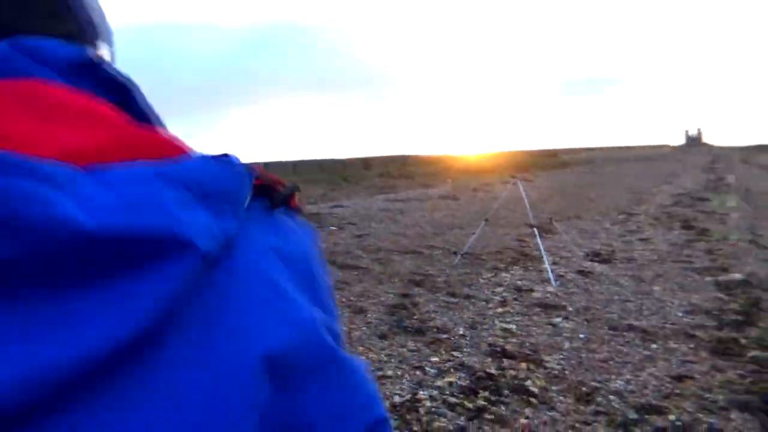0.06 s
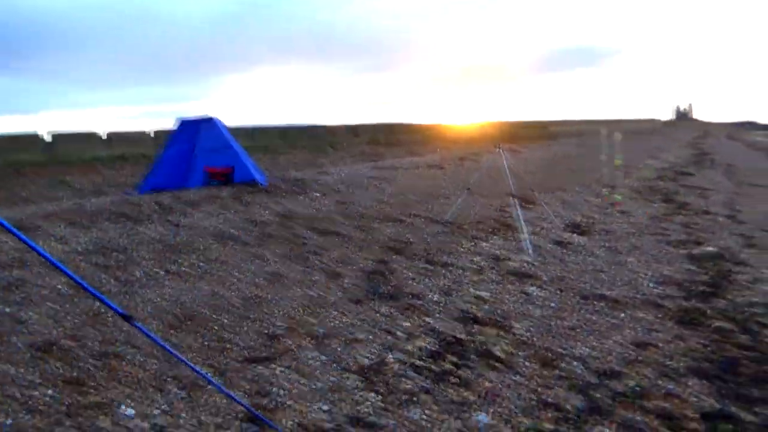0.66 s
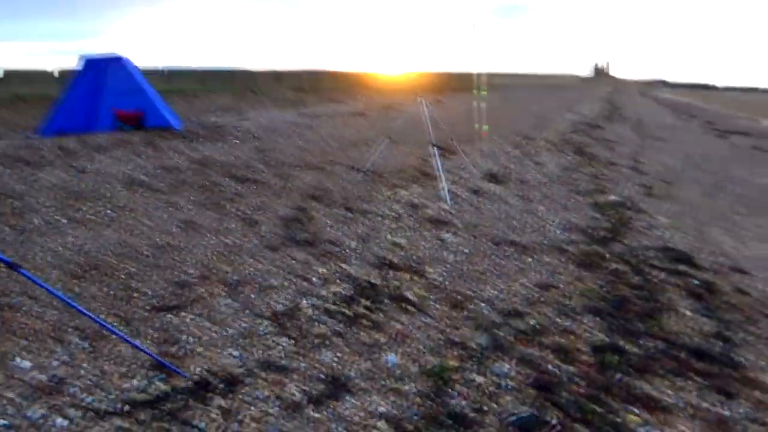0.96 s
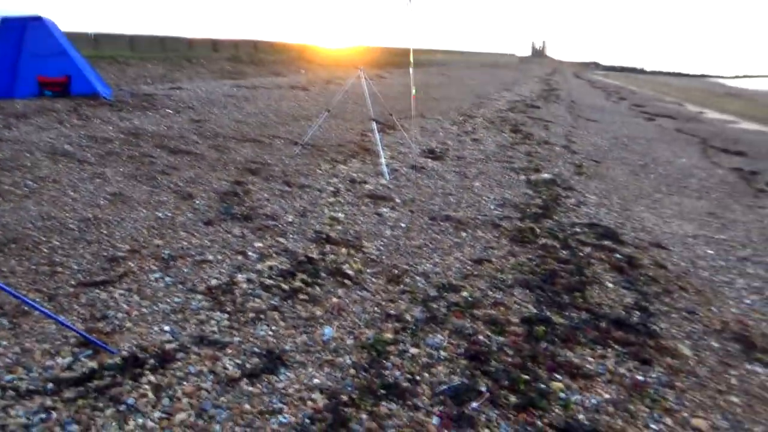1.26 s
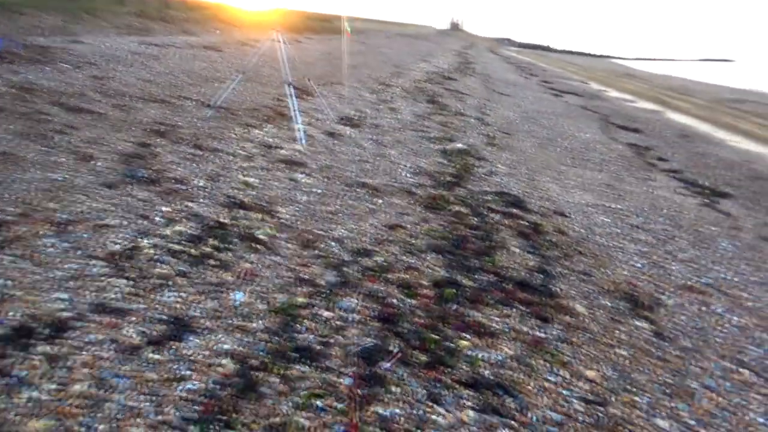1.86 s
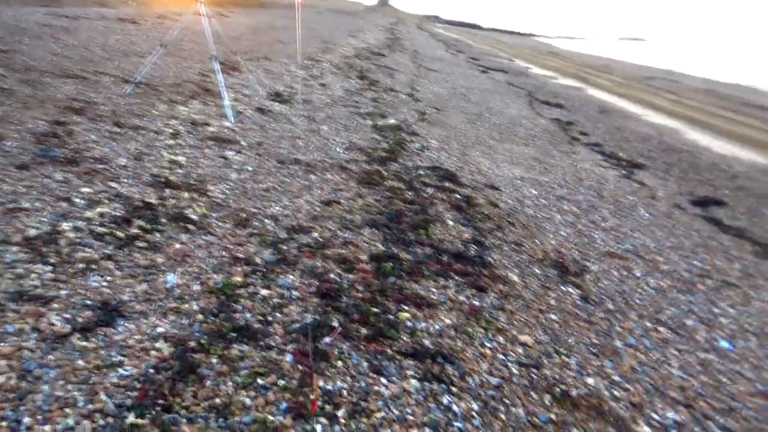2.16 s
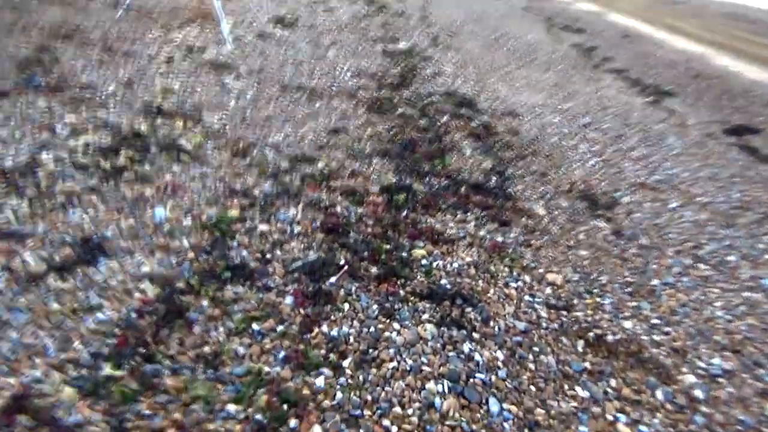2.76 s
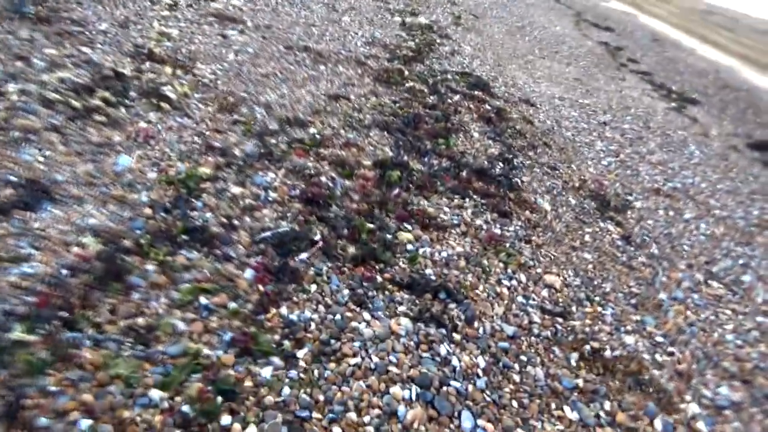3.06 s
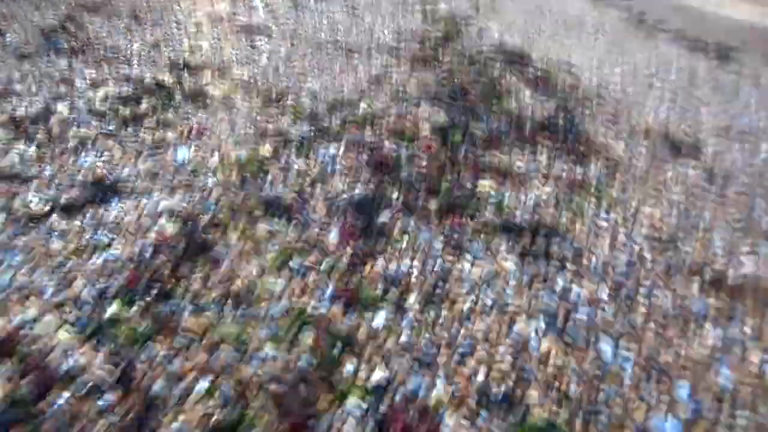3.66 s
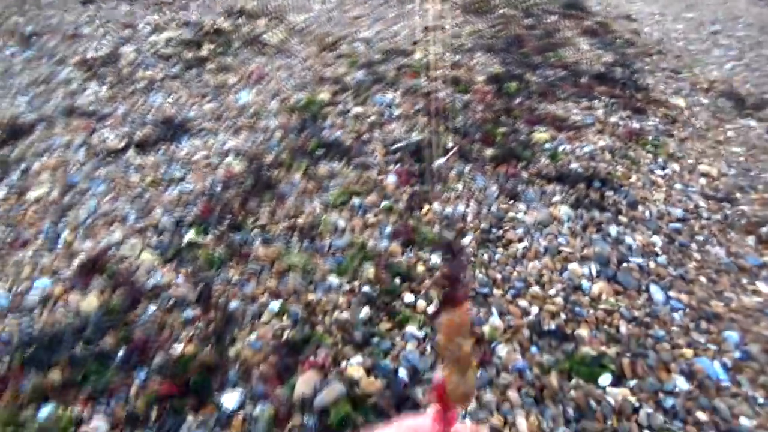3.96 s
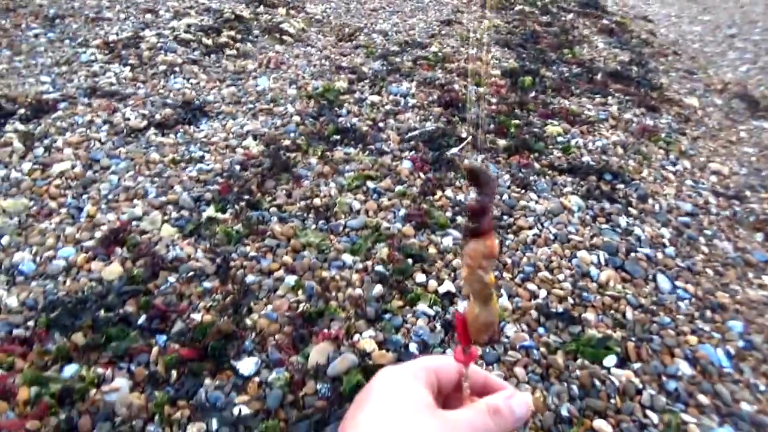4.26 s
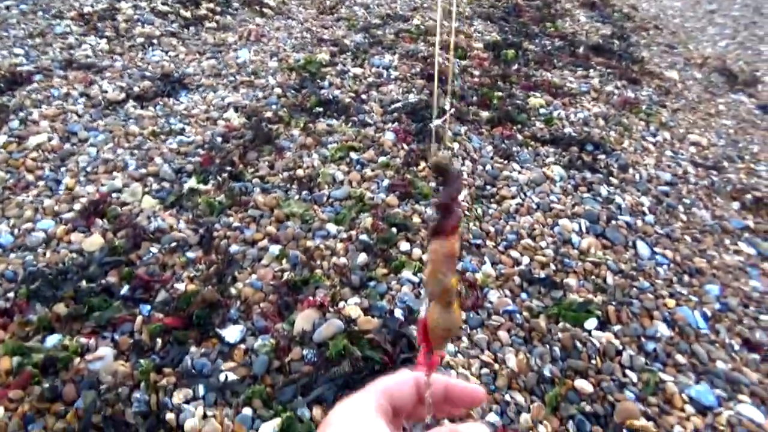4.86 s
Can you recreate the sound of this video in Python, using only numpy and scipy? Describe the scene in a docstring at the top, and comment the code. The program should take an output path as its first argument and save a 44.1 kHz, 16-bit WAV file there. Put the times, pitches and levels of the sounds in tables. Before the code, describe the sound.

A waterproof jacket scrapes directly over the microphone of a hand-held camera, loud and close from the start. Until about 1.3 seconds it comes in uneven surges, a bright hiss when fast and a crackle as it slows, with sharp little creaks from the folds. From 1.4 to 2.6 seconds the rubbing is weaker and patchier, jumping between left and right, with a hollow thrum from the camera body and a few faint bumps. A second loud stretch of scraping runs from 2.6 to 3.4 seconds, then dies away with a few ticks. From about 3.9 seconds a sleeve brushes lightly in short, grainy strokes over a low hiss, and a faint, airy ring from the rubbed case closes it around 5 seconds. Soft surf washes on the shingle beach throughout, while a very faint, far-off engine hum sinks slightly and fades at about 4.3 seconds.

```python
"""A waterproof jacket drags over a hand-held camera's two microphone ports, on a shingle beach.
The weave sticks and slips in surges: hiss when fast, crackle as it slows. Folds snap free and creak.
Coarser slips pass through the case, which rings and thrums; the hand nudges the case.
Later the cloth quietens and a sleeve brushes lightly; a faint, breath-like ring near 1340 Hz ends it.
Behind lie soft surf and the faint, sinking hum of a far-off engine."""
import sys
import numpy as np
from scipy import signal
from scipy.fft import rfft, irfft, next_fast_len
from scipy.io import wavfile
from scipy.ndimage import uniform_filter1d

SR = 44100
rng = np.random.default_rng(int(sys.argv[2]) if len(sys.argv) > 2 else 0)


def generate_wav(signal):
    """Clip the signal to [-1, 1] and save it as 16-bit WAV at the path in sys.argv[1]."""
    frames = np.transpose(np.atleast_2d(signal))
    scaled = np.clip(frames, -1, 1) * 32767
    pcm = np.round(scaled).astype(np.int16)
    wavfile.write(sys.argv[1], SR, pcm)


N = 226233
TIME = np.arange(N) / SR


def scrape():
    """Weave slips over the ports; slips grow uneven as a pull fades, and more threads snag."""
    # cloth pulls: (start [s], end [s], level [dB], sag [dB/s], rise [s], fade [s],
    # relative sheen [dB], base slip spread [dB])
    pulls = [(0, 0.312, -14, 5, .01, 0.071, -12.5, 0), (0.382, 0.612, -21, 27, 0.034, 0.074, -11.5, 6.5),
             (0.656, 0.823, -19.5, -5, 0.0077, 0.035, -20, -1),
             (.83, 0.883, -17.5, 0, 0.018, 0.071, -10, 3), (0.942, 1.265, -17.5, 21.5, .01, 0.12, -10, 6.5),
             (1.329, 1.473, -25.5, 6, 0.038, 0.14, -12.5, 4.5), (1.733, 1.773, -35, 0, .02, .07, -5.5, 1),
             (1.888, 2.023, -33.5, 24, 0.0068, 0.028, 3.5, 4),
             (2.093, 2.294, -33.5, 7, .04, 0.038, -7.5, 6), (2.327, 2.367, -25, 0, .025, 0.084, -8, 6.5),
             (2.449, 2.57, -31.5, 15, 0.022, 0.037, 2.5, 6),
             (2.598, 3.05, -15.5, 0.5, 0.0091, 0.086, -12.5, -0.5),
             (3.151, 3.203, -16.5, 0, 0.043, 0.029, -14.5, 1),
             (3.234, 3.431, -14, 19, 0.034, 0.083, -16.5, 0), (3.85, 5.128, -45, 9.5, .1, .1, -12.5, 8)]
    # port hiss spectrum: (frequency [Hz], level [dB])
    hiss_spectrum = [(100, -71), (1500, -31), (3000, -18.5), (4200, -12), (5500, -6), (7000, -3),
                     (8300, -1.5), (9200, -2), (10000, -6.5), (11500, -17), (13000, -36), (15500, -41)]
    # top-octave sheen spectrum: (frequency [Hz], level [dB])
    sheen_spectrum = [(1000, -71), (6500, -10), (8800, 7.5), (10000, 3), (11800, 0), (13500, -5.5),
                      (15500, -13)]
    spread_per_fade_db = 0.1
    shapes_db, sheens_db, spreads_db = [], [], []
    for start, end, db, sag_db_per_s, rise_s, fade_s, sheen_db, base_spread_db in pulls:
        sag_db = sag_db_per_s * np.clip(TIME - start, 0, end - start)
        shapes_db.append(db - sag_db + stroke(start, end, rise_s, fade_s))
        sheens_db.append(sheen_db)
        spreads_db.append(base_spread_db - spread_per_fade_db * stroke(0, end, rise_s, fade_s))
    spread_db = np.clip(blend(shapes_db, spreads_db), 0, 12)
    grain = slips(spread_db, rate_hz=2600, relax_s=0.0029)
    drag = grain * power_sum(shapes_db, np.zeros(len(pulls)))
    force = snags(drag, share=0.044 * spread_db, rate_hz=360, spread_db=6.5, relax_s=0.00063)
    hiss = ports(force, hiss_spectrum, side_db=-18)
    sheen = ports(grain * power_sum(shapes_db, sheens_db) * undb(5.5), sheen_spectrum)
    return cover(hiss, depth=1.14) + cover(sheen, depth=0.07)


def slips(spread_db, rate_hz, relax_s):
    """Stick-slip force of even mean power: random slips, each relaxing exponentially."""
    onsets = rng.random(N) < rate_hz / SR
    size_db = spread_db * np.clip(rng.standard_normal(N), -2.3, 2.3)
    pole = np.exp(-2 / (relax_s * SR))
    power = signal.lfilter([1], [1, -pole], onsets * undb(size_db) ** 2) + 1e-9
    return np.sqrt(power / np.maximum(uniform_filter1d(power, size=2200), 1e-9))


def snags(force, share, rate_hz, spread_db, relax_s):
    """Threads catch and let go: a share of the power arrives as short ticks."""
    share = np.clip(share, 0, 0.9)
    return force * np.sqrt(1 - share + share * slips(spread_db, rate_hz, relax_s) ** 2)


def cover(pair, depth):
    """Cloth lies more on one port than on the other."""
    # port balance at depth 1: (time [s], left minus right [dB])
    balance_curve = [(0, 0.5), (.63, 0), (.67, 6.5), (.86, 1.5), (1.22, 2.5), (1.48, 15.5), (1.84, 14),
                     (1.9, -20), (2.02, 19.5), (2.35, -0.5), (2.54, -8), (2.62, 0), (3.37, -1.3), (3.44, 6),
                     (3.55, -7), (3.95, -0.5)]
    pan_db = depth * np.interp(TIME, *np.transpose(balance_curve))
    balance = undb(np.array([pan_db, -pan_db]) / 2)
    return pair * balance / balance.mean(axis=0)


def case_rub():
    """Coarser slips ring and thrum the case; a faint, breath-like ring follows at the end."""
    # surges of cloth on the case, except the last row, a faint, breath-like ring near 1340 Hz:
    # (start [s], end [s], relative dry rub [dB], relative hollow ring [dB], relative thrum [dB],
    # narrow ring pitch [Hz], narrow ring level [dB])
    surges = [(0, 0.033, -28.5, -39, -44, 920, -46), (.14, 0.314, -34, -40, -47, 937, -54),
              (.37, 0.668, -37, -39, -47, 957, -41), (.74, 0.794, -27, -34, -39, 978, -38),
              (.92, 0.952, -35, -36.5, -48, 939, -42), (1.02, 1.26, -46, -47.5, -53, 968, -51),
              (1.33, 1.44, -31.5, -34.5, -36.5, 1237, -40.5), (1.62, 1.699, -40, -37.5, -39.5, 1146, -40.5),
              (1.75, 1.839, -37, -34, -39.5, 1140, -44), (1.92, 1.984, -31, -33, -35.5, 1398, -40),
              (2.08, 2.16, -41, -39, -48, 1204, -59), (2.25, 2.47, -34.5, -31.5, -38, 1163, -48),
              (2.53, 2.625, -33, -29.5, -42, 1150, -52), (2.8, 2.857, -22.5, -24, -41.5, 866, -33.5),
              (2.93, 3.241, -25, -30.5, -42, 894, -36.5), (3.29, 3.36, -22.5, -31.5, -38.5, 894, -43),
              (3.43, 3.46, -28.5, -27.5, -37.5, 1151, -44), (3.6, 3.903, -47.5, -49, -53.5, 886, -64),
              (4.02, 4.334, -48.5, -44.5, -50, 960, -64), (4.7, 5.13, -52.5, -47, -50.5, 1340, -51)]
    # dull scuffs on the case: (crest time [s], level [dB])
    scuff_crests = [(.572, -29), (1.15, -35), (1.396, -27), (1.442, -31), (1.633, -33), (4.2, -37),
                    (4.625, -39)]
    # dry rub spectrum: (frequency [Hz], level [dB])
    rub_spectrum = [(50, -56), (400, -36), (1000, -4.5), (1600, -1), (2100, 0), (2800, 0), (4000, 0.5),
                    (5500, -1), (8000, -1.5), (14000, -46)]
    # hollow ring spectrum: (frequency [Hz], level [dB])
    hollow_spectrum = [(50, -53), (300, -31.5), (550, -6), (750, -0.5), (900, 1), (1150, 0), (1400, -1),
                       (2000, -6), (4000, -43)]
    # low thrum spectrum: (frequency [Hz], level [dB])
    thrum_spectrum = [(25, -31), (60, -29), (110, -30.5), (160, -14), (230, -10), (340, -0.5), (460, -1.5),
                      (570, -6), (800, -8.5), (1600, -34)]
    rub_gain_db, hollow_gain_db, thrum_gain_db = 2, -3, -1
    starts, ends, rub_db, hollow_db, thrum_db, ring_hz, ring_db = np.transpose(surges)
    shapes_db = np.array([stroke(a, b, rise_s=0.056, fade_s=0.061) for a, b in zip(starts, ends)])
    force = slips(spread_db=0.4, rate_hz=1800, relax_s=0.0021)
    scuffs = swells(scuff_crests, rise_s=0.0045, fade_s=0.008)
    rub_force = force * power_sum(shapes_db, rub_db + rub_gain_db)
    hollow_force = force * np.hypot(power_sum(shapes_db, hollow_db + hollow_gain_db), scuffs)
    rub = ports(rub_force, rub_spectrum, side_db=-3.5, lag_s=1e-5)
    hollow = ports(hollow_force, hollow_spectrum, lag_s=7e-5)
    thrum = ports(power_sum(shapes_db, thrum_db + thrum_gain_db), thrum_spectrum, lag_s=9e-5)
    ring = narrow_ring(force, blend(shapes_db, ring_hz), width_hz=150, lag_s=8e-5)
    return cover(rub, depth=0.45) + hollow + thrum + ring * power_sum(shapes_db, ring_db)


def narrow_ring(force, hz, width_hz, lag_s):
    """Breathy ring: a narrow band of noise around a moving pitch."""
    push = force * (rng.standard_normal(N) + 1j * rng.standard_normal(N))
    baseband = signal.sosfilt(signal.butter(2, width_hz / 2, fs=SR, output="sos"), push)
    carrier = np.exp(2j * np.pi * np.cumsum(hz) / SR)
    ring = unit(np.real(baseband * carrier))
    return np.array([ring, delay(ring, lag_s)])


def creaks(tick_s=0.00016, stutter_t60_s=0.011):
    """Folds snap free and ring the ports: one sharp tick and a short stutter each."""
    # fold snaps: (time [s], relative peak [dB], pitch [Hz], stutter gain [dB])
    folds = [(.3926, 2, 8500, -4), (.415, -3, 6850, -14), (.4549, -2, 7500, -5), (.462, -1, 8790, -7),
             (.5884, -5, 8500, -3), (.9136, -3, 8530, -13), (1.096, -2, 7810, -13), (1.1116, -6, 8610, -9),
             (1.1327, -5, 7390, -4), (1.1574, 2.5, 8100, -13), (1.1752, -1, 9280, -23),
             (1.1818, -7, 8900, -10), (1.2006, 1, 8700, -19), (1.208, 5, 8910, -20), (1.229, -1, 9300, -24),
             (1.2574, 0, 7930, -12), (1.267, 4.5, 7900, 7), (1.3089, -5, 7000, -14),
             (1.5904, -10.5, 8650, -8), (1.8236, -18, 8860, -6), (2.0153, -11, 9100, -6),
             (2.1073, -2, 7760, 0), (2.135, -9.5, 6260, -6), (2.153, -9, 7500, -9), (2.172, -15, 7970, -6),
             (2.3458, -4, 9100, -10), (2.3613, -4, 8800, -7), (2.4793, -2, 8170, -14),
             (2.4973, -3.5, 9100, -4), (2.5128, 0, 8260, -9), (3.539, -8, 6570, -15),
             (3.5583, -5.5, 8280, -10), (3.604, -4.5, 8460, -27), (3.6544, -13.5, 7700, -6),
             (3.6671, -16, 7770, -13), (3.7165, -17, 7100, -2), (3.7314, -16.5, 7350, -7),
             (4.2024, -29, 7350, -12), (4.7314, -25, 8820, -7)]
    out = np.zeros(N)
    t = np.arange(2000) / SR
    for time_s, db, hz, stutter_db in folds:
        tick = np.sin(2 * np.pi * hz * t) * (t / tick_s) * np.exp(-t / tick_s)
        band = signal.butter(2, [0.78 * hz, 1.31 * hz], "band", fs=SR, output="sos")
        stutter = signal.sosfilt(band, rng.standard_normal(len(t)))
        snap = tick + stutter * undb(stutter_db - 60 * t / stutter_t60_s)
        i = int((time_s + 0.0004) * SR)
        out[i:i + len(t)] += undb(db - 2.5) * snap / np.abs(snap).max()
    return out


def sleeve():
    """The sleeve brushes in short strokes, grainy with snagging threads."""
    # light brushes: (crest time [s], relative level [dB])
    crests = [(3.88, -43), (3.965, -36.5), (4.04, -35), (4.092, -36), (4.13, -38), (4.194, -33.5),
              (4.273, -44), (4.322, -38.5), (4.358, -37), (4.506, -38), (4.626, -35.5), (4.733, -38),
              (4.799, -37.5)]
    # sleeve friction spectrum: (frequency [Hz], level [dB])
    spectrum = [(100, -41), (300, 7.5), (550, -4), (900, 6.5), (1700, -3), (3000, -3), (5000, -3.5),
                (7000, -1.5), (9200, -4.5), (11000, -14), (15000, -34)]
    strokes = undb(2) * swells(crests, rise_s=0.0028, fade_s=0.015)
    force = snags(strokes, share=0.6, rate_hz=700, spread_db=4.5, relax_s=0.00053)
    return ports(force, spectrum, side_db=-4)


def nudges():
    """The hand bumps the case: faint low thuds."""
    # bumps: (crest time [s], level [dB])
    crests = [(.675, -51), (1.19, -62), (1.89, -57), (2.56, -55)]
    # thud spectrum: (frequency [Hz], level [dB])
    spectrum = [(20, -14), (45, -5), (90, -10), (150, -6), (300, -34), (900, -55)]
    return ports(swells(crests, rise_s=0.01, fade_s=0.033), spectrum)


def surf(level_db=-47.5, level_at_s=3.48, rise_db_per_s=0.6):
    """Soft wash on the shingle, wavering as it slowly builds."""
    # wash spectrum: (frequency [Hz], level [dB])
    spectrum = [(25, -34), (60, -17.5), (120, -7), (200, 0.5), (280, 2), (450, -2.5), (750, 3.5),
                (1300, -3), (2000, -7), (3200, -7), (8000, -25), (15000, -24)]
    wash_db = level_db + rise_db_per_s * (TIME - level_at_s) + wander(7.6)
    return ports(undb(wash_db), spectrum, side_db=9.5)


def engine_hum(start_hz=402.6, sag_hz_per_s=7.8, level_db=-53.5, end_s=4.33):
    """Far-off engine: one wavering tone that sinks, then fades."""
    hz = (start_hz - sag_hz_per_s * TIME) * (1 + 0.008 * wander(35))
    phase = 2 * np.pi * np.cumsum(hz) / SR
    envelope_db = level_db + stroke(0, end_s, rise_s=0.072, fade_s=0.072)
    flutter_db = 2.6 * wander(16) + 2.2 * wander(55)
    return np.sqrt(2) * np.sin(phase) * undb(envelope_db + flutter_db)


def ports(envelope, spectrum, side_db=0, lag_s=0):
    """Coloured noise at both ports: mid at the envelope's RMS, lagged on the right, plus side."""
    # difference between the ports, before side_db: (frequency [Hz], side minus mid [dB])
    width = [(100, -44), (300, -23.5), (600, -17), (1500, -20.5), (4000, -10), (8000, -4.5), (13000, -85)]
    mid, side = colour(envelope * rng.standard_normal((2, N)), spectrum)
    side = undb(side_db) * colour(side, width)
    pair = np.array([mid + side, delay(mid, lag_s) - side])
    return pair * np.sqrt(np.mean(envelope ** 2) / np.mean(mid ** 2))


def colour(x, spectrum):
    """Minimum-phase filter through (frequency [Hz], gain [dB]) points."""
    size = next_fast_len(N + 4096, real=True)
    hz, db = np.transpose(spectrum)
    bin_hz = np.arange(size // 2 + 1) * SR / size
    gain_db = np.interp(np.log(bin_hz + 1), np.log(hz), db)
    cepstrum = irfft(np.log(undb(gain_db)), size)
    cepstrum[1:size // 2] *= 2
    cepstrum[size // 2 + 1:] = 0
    return irfft(rfft(x, size) * np.exp(rfft(cepstrum)), size)[..., :N]


def stroke(start_s, end_s, rise_s, fade_s):
    """Envelope [dB]: 0 from start to end, exponential rise before and fade after."""
    before = np.maximum(start_s - TIME, 0) / rise_s
    after = np.maximum(TIME - end_s, 0) / fade_s
    return -20 / np.log(10) * (before + after)


def swells(crests, rise_s, fade_s):
    """Amplitude with one rise and fade per (time [s], level [dB]) row."""
    return sum(undb(db + stroke(s, s, rise_s, fade_s)) for s, db in crests)


def power_sum(shapes_db, levels_db):
    """Joint amplitude of overlapping movements."""
    return np.sqrt(sum(undb(shape + db) ** 2 for shape, db in zip(shapes_db, levels_db)) + 1e-18)


def blend(shapes_db, values):
    """Power-weighted mean of one value per movement."""
    weights = undb(shapes_db - np.max(shapes_db, axis=0)) ** 2
    return sum(w * v for w, v in zip(weights, values)) / weights.sum(axis=0)


def wander(rate_hz):
    """Linearly joined random values, RMS 1."""
    return unit(np.interp(TIME * rate_hz, np.arange(N), rng.standard_normal(N)))


def delay(x, lag_s):
    return np.interp(TIME - lag_s, TIME, x)


def undb(db):
    return 10 ** (np.asarray(db) / 20)


def unit(x):
    return x / np.sqrt(np.mean(x ** 2) + 1e-18)


def scene():
    """Close, loud cloth over the open beach."""
    return scrape() + case_rub() + creaks() + sleeve() + nudges() + engine_hum() + surf()


def record(dry):
    """The camera rounds the peaks and cuts the top."""
    ceiling, gain, cutoff_hz = 0.92, 1.06, 15600
    rounded = ceiling * np.tanh(gain * dry / ceiling)
    return signal.sosfilt(signal.ellip(10, 0.1, 80, cutoff_hz, fs=SR, output="sos"), rounded)


dry = scene()
out = record(dry)
generate_wav(out)
```